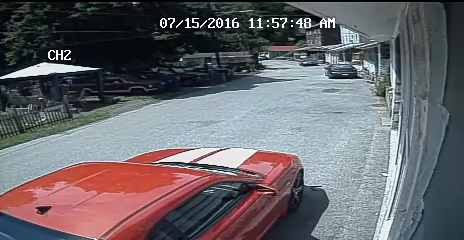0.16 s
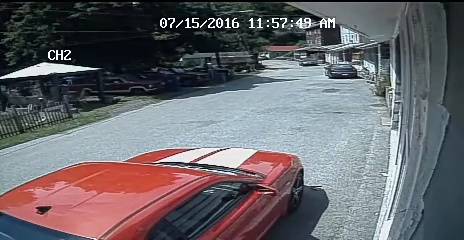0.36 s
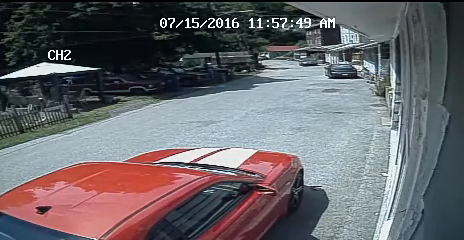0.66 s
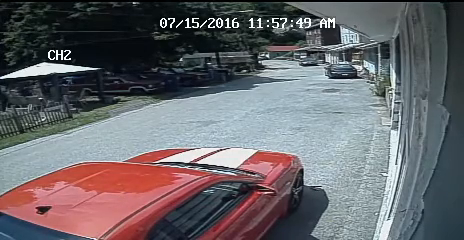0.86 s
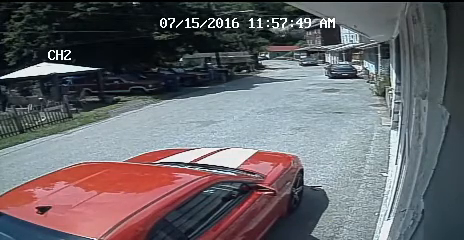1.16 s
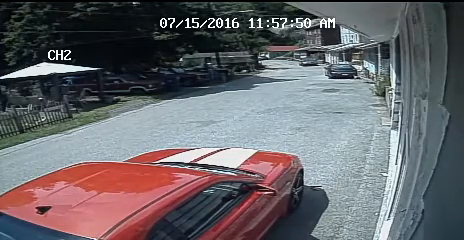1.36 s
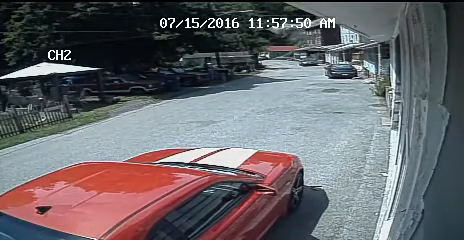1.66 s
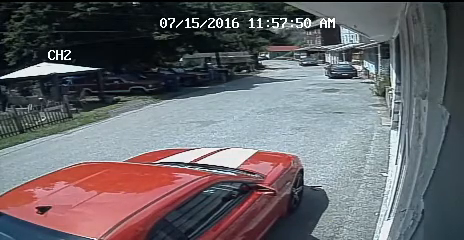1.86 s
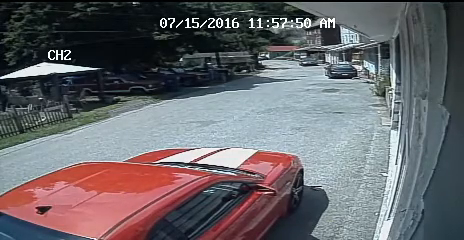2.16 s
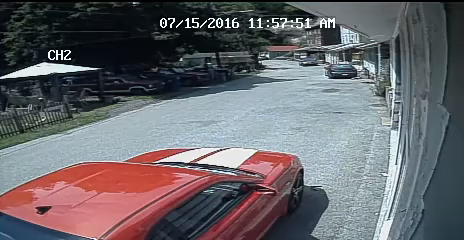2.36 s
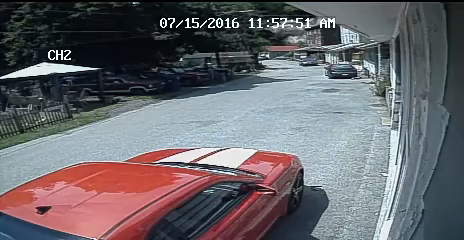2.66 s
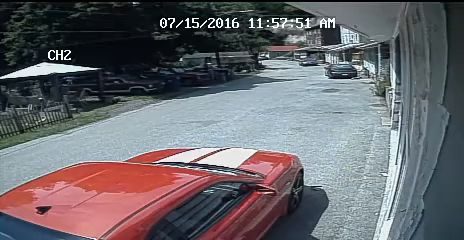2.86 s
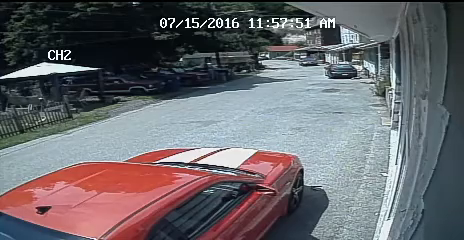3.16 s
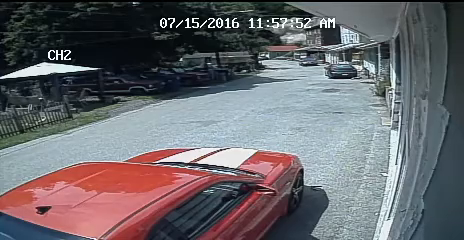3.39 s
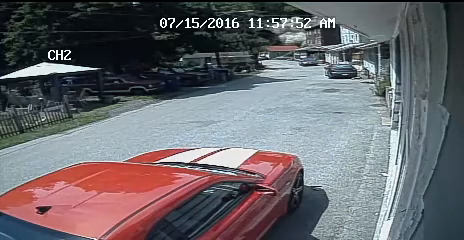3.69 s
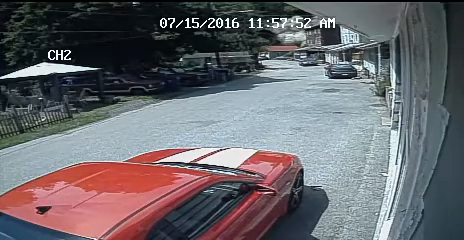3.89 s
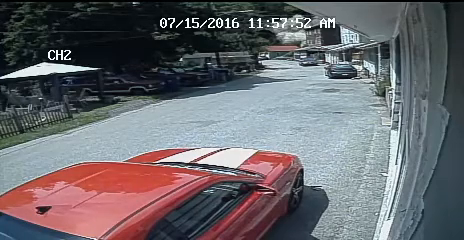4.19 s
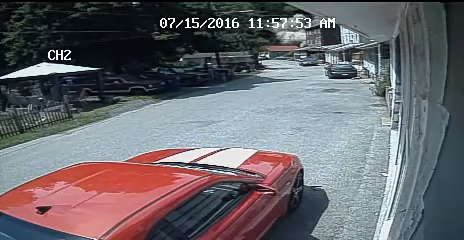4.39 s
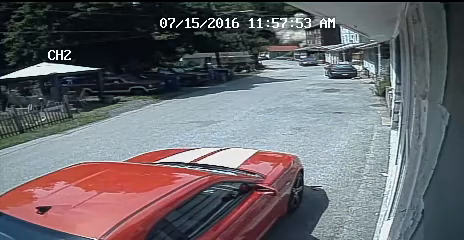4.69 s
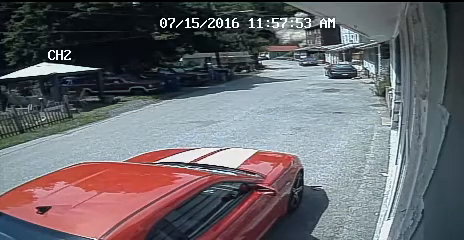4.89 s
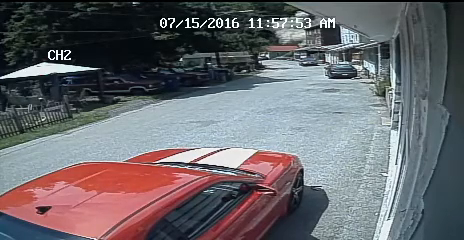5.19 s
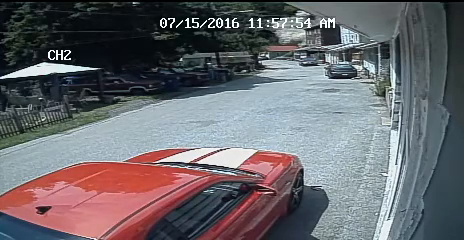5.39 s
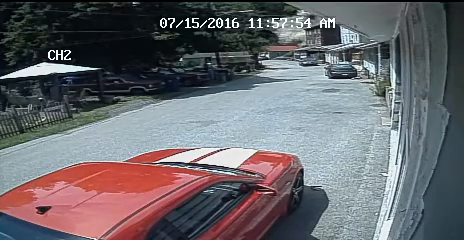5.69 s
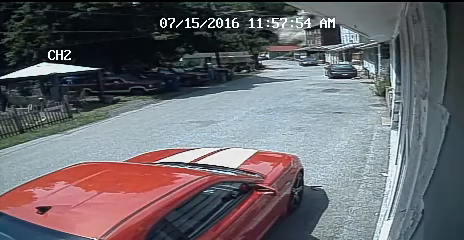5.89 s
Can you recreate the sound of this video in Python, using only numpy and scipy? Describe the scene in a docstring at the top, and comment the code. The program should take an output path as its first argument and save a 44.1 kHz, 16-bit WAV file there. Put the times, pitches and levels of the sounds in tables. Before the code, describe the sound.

A sudden, very loud blast breaks the quiet of an outdoor lane, with a rapid string of sharp, distorted cracks over a heavy rumble. A house collapses in a dense, crackling roar that slowly dies away while scattered debris knocks and rattles on the ground. Near the end a bird chirps once over soft air and a distant hum. The small surveillance microphone overloads and sounds telephone-like.

```python
"""A house blows up and collapses at the far end of a gravel lane: shock fronts, a rumble, a splintering roar.
A security camera under a porch roof hears it, and its microphone amplifier overloads,
choking on the slow pressure surges. Debris rains down and the rumble dies away,
leaving outdoor air, a distant machine hum and a bird."""
import sys
import numpy as np
from scipy import signal
from scipy.fft import rfft, irfft
from scipy.io import wavfile

SR = 44100
rng = np.random.default_rng(int(sys.argv[2]) if len(sys.argv) > 2 else 0)


def to_wav(sig):
    """Store sig (one row per channel, or 1-D mono) as 16-bit WAV at the path in sys.argv[1].

    Samples outside -1..1 are clipped; the rate is SR.
    """
    pcm = np.clip(np.atleast_2d(sig), -1, 1) * 32767
    pcm = np.round(pcm).astype(np.int16)
    wavfile.write(sys.argv[1], SR, pcm.T)  # frames by channels


N = 266584
TIME = np.arange(N) / SR
FREQ = np.fft.rfftfreq(N, 1 / SR)
GROUND_SHAKE_S = .445  # just ahead of the first blast

# tone of splintering timber and shock cracks: freq_hz, relative_db
SPLINTER_SPECTRUM = [(250, -17), (600, -0.5), (1000, -0.5), (1500, -5), (2200, -10.5), (3000, -10.5),
                     (4300, -15.5)]


def undb(db):
    """Decibels to gain."""
    return 10 ** (np.asarray(db) / 20)


def unit(x):
    """Scale to rms 1."""
    return x / np.sqrt(np.mean(x ** 2))


def add(out, start_s, sound):
    """Mix a sound in at start_s."""
    start = max(int(start_s * SR), 0)
    out[start:start + len(sound)] += sound[:max(N - start, 0)]


def colour(x, spectrum):
    """EQ x through (freq_hz, relative_db) points, at rms 1."""
    hz, db = np.transpose(spectrum)
    gain = undb(np.interp(np.log(FREQ + 1e-9), np.log(hz), db, left=-120, right=-120))
    return unit(irfft(rfft(x) * gain, N))


def one_pole(x, hz):
    """Gentle low-pass: a capacitor charging."""
    keep = np.exp(-2 * np.pi * hz / SR)
    return signal.lfilter([1 - keep], [1, -keep], x)


def walk(rate_hz):
    """Smooth random drift at rms 1."""
    return unit(one_pole(one_pole(rng.standard_normal(N), rate_hz), rate_hz))


def arch(length_s):
    """A half-sine pulse."""
    return np.abs(np.sin(np.linspace(0, np.pi, max(int(length_s * SR), 2))))


def decay(t, t60_s):
    """Envelope that falls 60 dB in t60_s."""
    return np.exp(-np.log(1000) * t / t60_s)


def swell(peak_s, rise_db_per_s, hold_s, fall_db_per_s):
    """Envelope that climbs to 1 at peak_s, holds, then dies away."""
    attack_db = rise_db_per_s * np.maximum(peak_s - TIME, 0)
    release_db = fall_db_per_s * np.maximum(TIME - peak_s - hold_s, 0)
    return undb(-attack_db - release_db)


def lane_reverb(x, t60_s, wet_db):
    """Walls and trees scatter a short tail behind each sound."""
    tail = rng.standard_normal(SR) * decay(TIME[:SR], t60_s)
    return x + undb(wet_db) * signal.fftconvolve(x, tail / np.linalg.norm(tail))[:N]


def outdoor_air(level_db=-39):
    """A soft, gently drifting bed of open air."""
    # tone of the air: freq_hz, relative_db
    air_spectrum = [(20, -2.5), (55, 6.5), (130, 5.5), (250, 9.5), (420, 5), (700, -3), (1200, -12),
                    (1800, -19.5), (4300, -26.5)]
    return undb(level_db + 1.1 * walk(1.5)) * colour(rng.standard_normal(N), air_spectrum)


def machine_hum():
    """A distant machine whose tones waver together with its speed."""
    # tones of the hum: pitch_hz, level_db
    tones = [(87, -49.5), (247, -46), (368, -48.5)]
    running_s = np.cumsum(1 + 0.0059 * walk(5.1)) / SR
    return sum(undb(db + walk(3.4)) * np.sin(2 * np.pi * hz * running_s) for hz, db in tones)


def bird(length_s=0.022, fall=0.11, rasp=0.056):
    """Short, raspy, falling chirps, smeared by the trees."""
    # the bird's calls: start_s, pitch_hz, level_db
    chirps = [(0.124, 3870, -54), (.205, 3750, -64), (5.451, 3840, -43)]
    out, envelope = np.zeros(N), arch(length_s)
    progress = np.linspace(0, 1, len(envelope))
    for start_s, pitch_hz, level_db in chirps:
        glide_hz = pitch_hz * (1 + fall * (.5 - progress) + rasp * walk(400)[:len(progress)])
        add(out, start_s, undb(level_db) * envelope * np.sin(2 * np.pi * np.cumsum(glide_hz) / SR))
    return lane_reverb(out, t60_s=.35, wet_db=4.0)


def falling_debris(thud_hz=60, thud_t60_s=0.047, rattle_t60_s=0.09, skitter=0.45):
    """Boards and roofing hit the ground: a rattle around each piece's own pitch over a dull thud."""
    # heavy pieces landing: start_s, rattle_db, pitch_hz, bandwidth_ratio, thud_db
    landings = [(2.804, -18.5, 930, 3.2, -35), (3.008, -22, 1170, 3.8, -28),
                (3.123, -21.5, 2700, 0.93, -27), (3.163, -9.5, 584, 1.26, -6.5),
                (3.39, -19.5, 2040, 1.16, -37), (3.482, -20, 500, 1.7, -15),
                (3.51, -22.5, 1390, 2.5, -33.5), (3.75, -24.5, 2570, 3.3, -52), (4.015, -26, 650, 0.5, -40),
                (4.043, -12, 688, 0.27, -47), (4.104, -24, 1390, 1.3, -46), (4.445, -26.5, 960, 0.62, -36),
                (4.58, -32.5, 1900, 4.2, -42), (4.679, -30, 830, 1.1, -37), (5.644, -39, 1140, .32, -55)]
    out, t = np.zeros(N), TIME[:SR // 2]
    thud = np.sin(2 * np.pi * thud_hz * t) * decay(t, thud_t60_s)
    for start_s, rattle_db, pitch_hz, width, thud_db in landings:
        t60_s = rattle_t60_s * width ** skitter  # a clean knock stops short, a broad clatter skitters on
        body = signal.iirpeak(pitch_hz, 1 / width, fs=SR)
        noise = rng.standard_normal(len(t))
        rattle = unit(signal.lfilter(*body, signal.lfilter(*body, noise)))
        add(out, start_s, undb(rattle_db) * rattle * decay(t, t60_s))
        add(out, start_s, undb(thud_db) * thud)
    return lane_reverb(out, t60_s=0.99, wet_db=-2)


def pressure_waves(shock_s=0.0066, crack_t60_s=0.015, echo_s=.008):
    """Slow surges hold the diaphragm one way, then cracking shocks push it the other way."""
    # the strongest shock fronts: start_s, surge_length_s, push_db, crack_db
    shocks = [(.457, 0.00099, 10, -41), (0.485, 0.0081, 3.5, -1), (0.495, 0.0051, 6, 7.5),
              (.524, 0.0048, -5, -23), (0.539, .003, 5.5, 1.5), (0.555, .006, 2, 5.5),
              (0.568, 0.0016, -10, -2), (0.595, .026, -30, -27), (0.651, 0.019, 0.5, 8),
              (.676, 0.0033, 8, 5.5), (0.695, .011, 1, 9), (.75, 0.038, 10.5, 6), (0.769, 0.016, 2, -12),
              (0.792, 0.0089, 7.5, 0), (0.885, 0.0062, 6.5, -1), (0.932, 0.0031, -16, 0.5),
              (1.078, .009, 5.5, -6), (1.131, 0.017, 7, -30), (1.191, .012, 2.5, -2),
              (1.237, 0.0094, 11, -8), (1.374, 0.015, 3.5, -4), (1.406, 0.0092, -7, -2),
              (1.445, 0.0049, -3, -1.5)]
    pressure, crack_envelope = np.zeros(N), np.zeros(N)
    for start_s, surge_length_s, push_db, crack_db in shocks:
        surge_db = 11.5 - 4 * (start_s - GROUND_SHAKE_S)  # later surges are weaker
        add(pressure, start_s - surge_length_s, undb(surge_db) * arch(surge_length_s) ** 0.72)
        shock = -undb(push_db) * arch(shock_s)
        crack = undb(crack_db) * decay(TIME[:SR // 8], crack_t60_s)
        add(pressure, start_s, shock)
        add(crack_envelope, start_s, crack)
        # the porch wall throws each shock back
        add(pressure, start_s + echo_s, undb(-9.5) * shock)
        add(crack_envelope, start_s + echo_s, undb(-6.5) * crack)
    return pressure + crack_envelope * colour(rng.standard_normal(N), SPLINTER_SPECTRUM)


def cracks(per_second, spread_db, smear_hz, smear_db):
    """Many small breaks and impacts of uneven size, each trailed by a scattered hiss."""
    struck = rng.random(N) < per_second / SR
    clicks = struck * rng.choice([-1, 1], N) * undb(spread_db * np.minimum(rng.exponential(size=N), 4))
    hiss_envelope = undb(smear_db) * np.sqrt(one_pole(clicks ** 2, smear_hz))
    return clicks + hiss_envelope * rng.standard_normal(N)


def wall_roar(shelf_hz=217):
    """Collapsing walls: impacts blur into a roar that deepens as it rolls back from further away."""
    # tone of the roar: freq_hz, relative_db
    roar_spectrum = [(50, -12), (120, -2.5), (200, 1), (330, 2), (480, -2.5), (700, -15.5), (1200, -17),
                     (4000, -56)]
    roar = colour(cracks(1500, spread_db=3.5, smear_hz=21.6, smear_db=3.0), roar_spectrum)
    bass_db = np.interp(TIME, [1.05, 2.4], [-6, 3.5])
    return roar + (undb(bass_db) - 1) * one_pole(roar, shelf_hz)


def splintering():
    """Timber and glass break in a dense, fluttering crackle."""
    breaks = cracks(1100, spread_db=1, smear_hz=21.4, smear_db=-1.5)
    return colour(breaks, SPLINTER_SPECTRUM) * undb(.8 * walk(18))


def explosion():
    """Heaving air, roaring walls and splintering timber swell with each stage of the blast."""
    # first blast, main blast, deep after-blast, collapse, debris rain, the highest pieces coming down:
    # peak_s, rise_db_per_s, hold_s, fall_db_per_s, then relative rumble_db, roar_db, splinter_db
    stages = [(0.482, 500, 0.13, 400, -14, -8.5, -17), (0.645, 470, 0.38, 58, -2.5, 0.5, -9.5),
              (1.114, 150, .27, 57.5, -4, -2, -18), (1.61, 45.5, .64, 60.5, -15, -9.5, -13),
              (2.303, 32, .2, 13, -26.5, -12.5, -18), (4.086, 5, 0.035, 14, -51, -34.5, -32.5)]
    # tone of the heaving air: freq_hz, relative_db
    rumble_spectrum = [(10, 10), (25, -11), (45, 7.5), (70, -6), (110, -23), (170, -12), (400, -40.5)]
    power = np.zeros((3, N))
    for peak_s, rise, hold_s, fall, *layer_db in stages:
        power += (undb(layer_db)[:, None] * swell(peak_s, rise, hold_s, fall)) ** 2
    rumble_gain, roar_gain, splinter_gain = np.sqrt(power)
    # the ground shakes first and its low rumble rolls on
    ground_roll = undb(-12) * swell(GROUND_SHAKE_S, rise_db_per_s=550, hold_s=0, fall_db_per_s=6)
    rumble = np.hypot(rumble_gain, ground_roll) * colour(rng.standard_normal(N), rumble_spectrum)
    return undb(-4.0) * rumble + undb(0.5) * (roar_gain * wall_roar() + splinter_gain * splintering())


def scene():
    """Sound pressure at the camera."""
    return (explosion() + pressure_waves() + falling_debris() + bird() + outdoor_air() + machine_hum())[None]


def amplifier(x, ceiling=0.37, depth=2.3, knee=1.86, leak=0.012, bias_hz=9, coupling_hz=6.5):
    """A lopsided stage: it saturates early upwards, late downwards, and overload drags its bias up."""
    biased = x + 0.81 * one_pole(np.maximum(np.abs(x) - ceiling, 0), bias_hz)
    headroom = np.where(biased > 0, ceiling, depth)
    saturated = biased / (1 + np.abs(biased / headroom) ** knee) ** (1 / knee) + leak * biased
    # while the stage is pinned, the coupling capacitor lets the output sag towards zero
    return saturated - one_pole(saturated, coupling_hz)


def record(dry, offset=.02, creep=.27, creep_above=0.57, band_hz=4100, top_hz=16000):
    """The camera's sound: a ringing housing, an overloaded amplifier and a telephone-wide band."""
    # resonances of the camera housing: centre_hz, width_hz, boost_db
    resonances = [(1267, 380, 2.5), (2010, 334, 8), (2886, 275, 5), (3670, 150, 4.5)]
    housing_db = sum(db * 2 ** -(2 * (FREQ - hz) / width) ** 2 for hz, width, db in resonances)
    boxy = irfft(rfft(dry[0]) * undb(housing_db), N)
    # long overload makes the resting level of the output creep upwards
    overload = one_pole(np.maximum(np.abs(boxy) - creep_above, 0), hz=4)
    rest = offset + creep * np.tanh(2 * overload)
    driven = undb(-0.5) * amplifier(boxy) + rest
    # the converter runs out of range before its band filter, the output once more after it
    band_filter = signal.firwin(161, band_hz, window=("kaiser", 7), fs=SR)
    narrow = signal.fftconvolve(np.clip(driven, -.72, .72), band_filter, "same")
    top_cut = signal.ellip(8, .2, 70, top_hz, fs=SR, output="sos")
    return signal.sosfilt(top_cut, np.clip(narrow, -.725, .725))[None]


dry = scene()
out = record(dry)
to_wav(out)
```